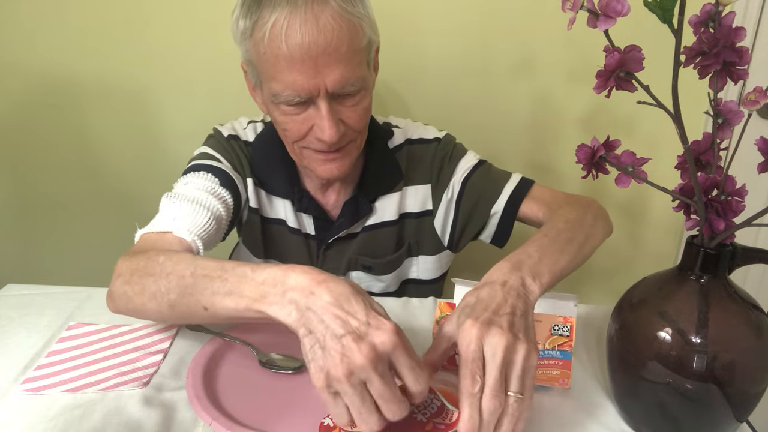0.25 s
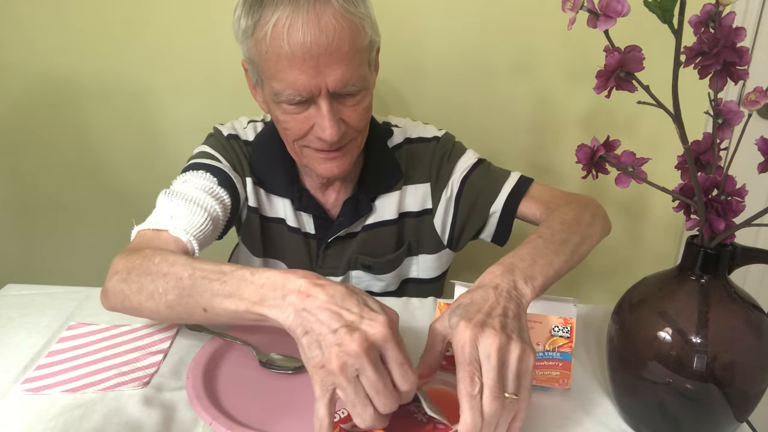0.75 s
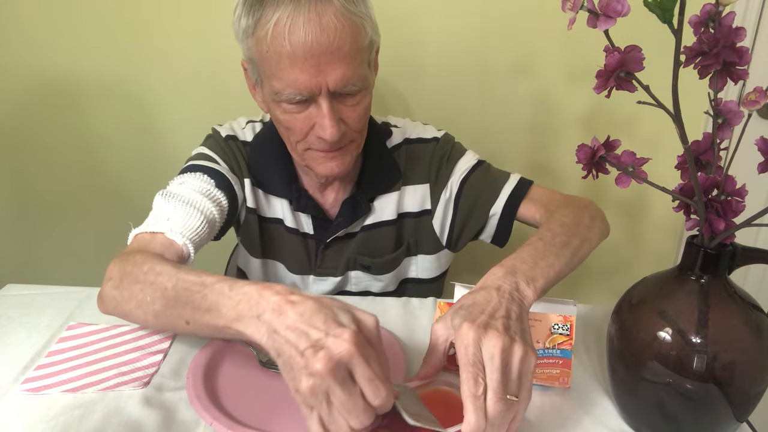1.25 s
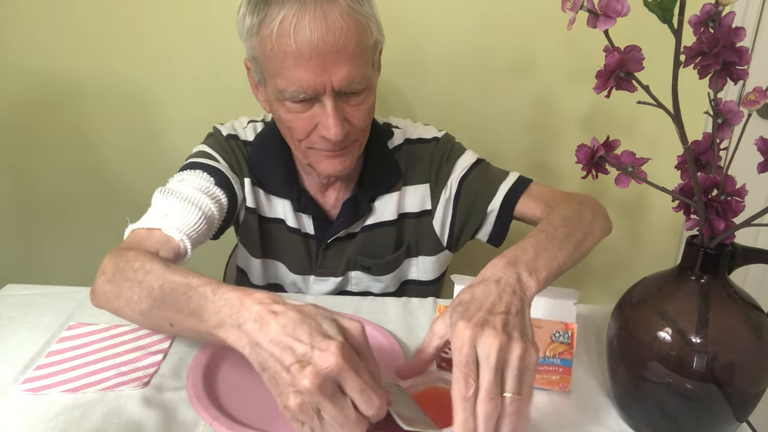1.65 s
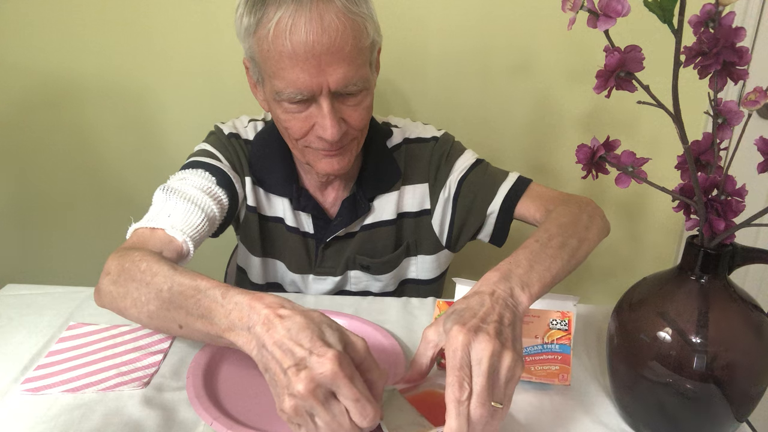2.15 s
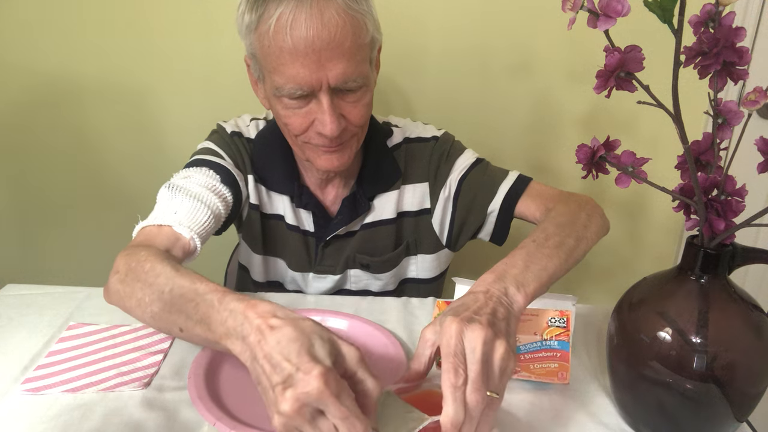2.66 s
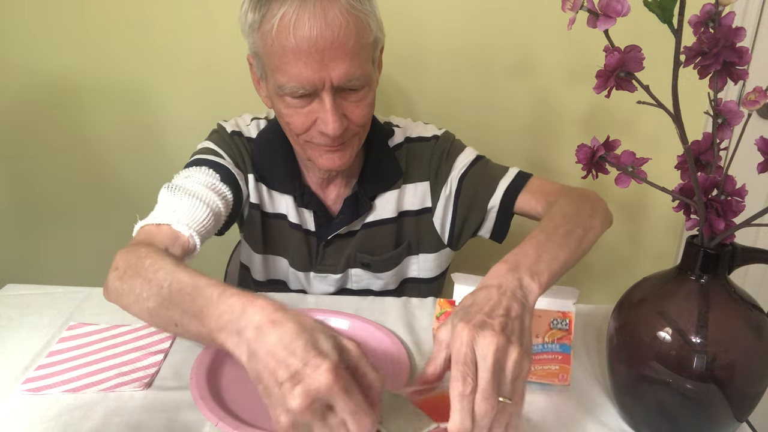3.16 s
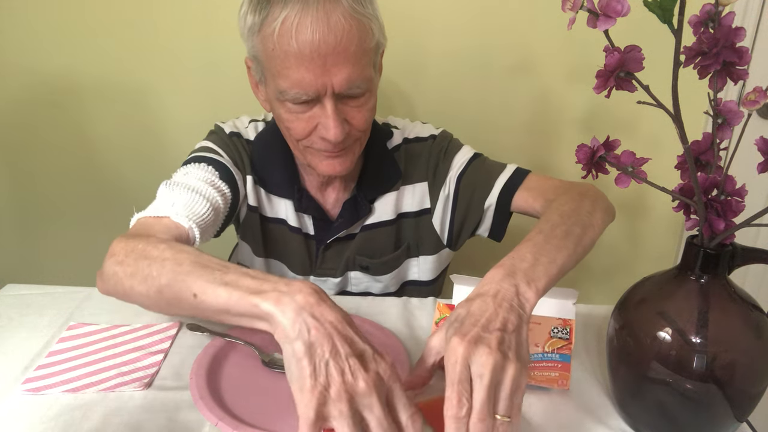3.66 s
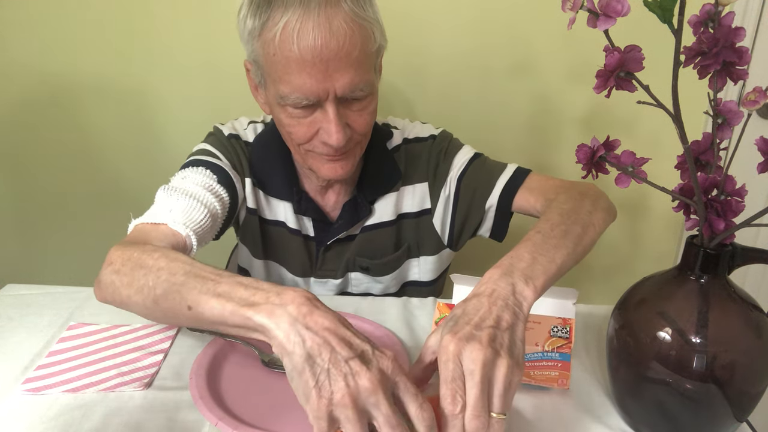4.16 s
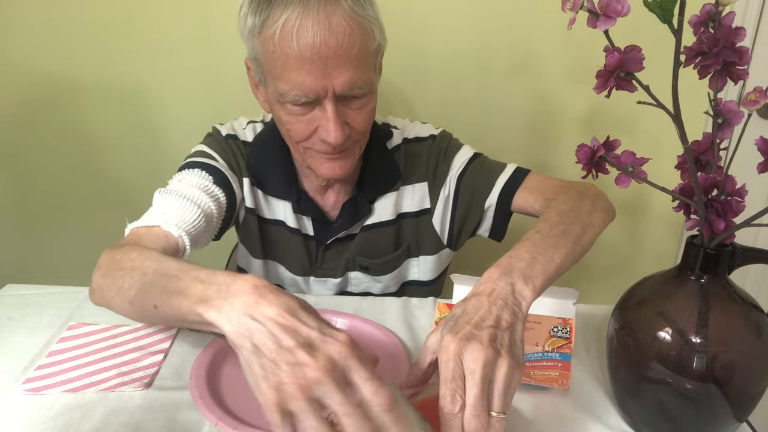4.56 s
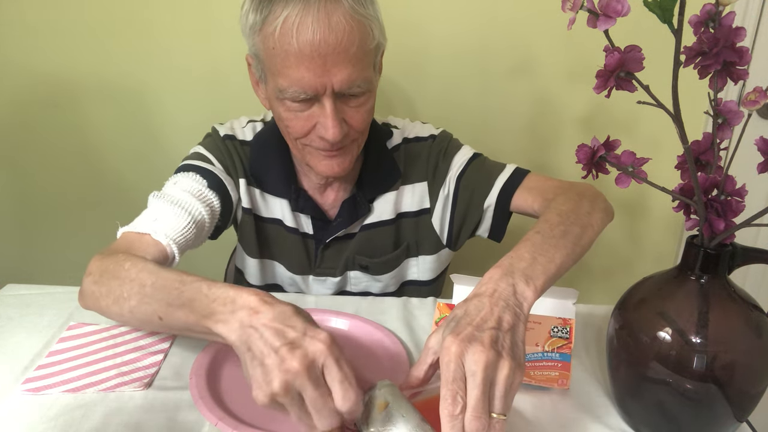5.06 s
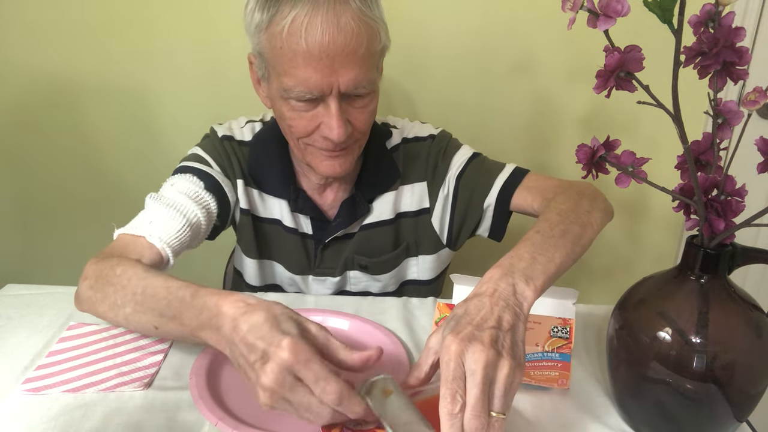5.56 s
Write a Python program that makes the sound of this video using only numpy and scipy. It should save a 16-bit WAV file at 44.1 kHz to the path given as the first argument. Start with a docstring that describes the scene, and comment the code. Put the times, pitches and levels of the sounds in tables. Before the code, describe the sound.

Fingers pick at the stuck foil lid of a small plastic cup, close to the microphone in a small room with a faint low hum. Light clicks and foil rustling start at once, leading to the loudest sound, a hard snap with dull pops, at about 0.8 seconds. Smaller clusters of clicks and pops follow around 1.2, 2.2 and 2.5 seconds, with faint short rasps as the seal tears. Hands bump the table with low booms, most clearly at 1.8, 2.7 and 3.1 seconds. A tiny, faint fingernail squeak comes at 3 seconds, then a few bright snaps near 3.3. From 3.5 seconds the rubbing and tearing get busier, peaking in a crinkly burst around 4.3 and a strong snap at 4.5. After a short lull, more crackling builds to a quick group of sharp cracks at about 5.4 seconds.

```python
"""Picking open a foil-lidded cup

Fingers tug at the stuck foil lid of a small plastic gel cup, close to a camera on a table in a small
room. Lid and cup wall buckle with sharp snaps and dull pops, the seal tears in short rasps, fingertips
rub and crinkle the foil, and a nail squeaks once. The hands bump the table, which booms."""
import sys
import numpy as np
from scipy import signal
from scipy.fft import rfft, irfft, next_fast_len
from scipy.io import wavfile
from scipy.ndimage import uniform_filter1d

SR = 44100
rng = np.random.default_rng(int(sys.argv[2]) if len(sys.argv) > 2 else 0)


def master_out(mix):
    """Clip the mix to full scale and print it as 16-bit PCM to the path in sys.argv[1]."""
    frames = np.transpose(np.atleast_2d(mix))
    ceiling = np.clip(frames, -1, 1)
    pcm = np.round(ceiling * 32767).astype(np.int16)
    wavfile.write(sys.argv[1], SR, pcm)


N = 255537

# lid and cup buckle: t/s, level/dB, ring f/Hz, body/dB, fizz/dB
SNAPS = [(.161, -28, 2050, -5.5, -14.5), (.345, -23.5, 1290, -3, -13.5), (0.3456, -27, 1990, 3.5, -14),
         (0.4214, -21, 2160, -10.5, -19), (0.437, -17.5, 2200, -13, -22), (.472, -18.5, 2040, -17.5, -22),
         (.59, -24, 1580, -11.5, -26), (.624, -23.5, 2200, -16.5, -21.5), (.7748, 4.5, 895, -12, -16.5),
         (0.782, -9, 1010, -18, -23), (.787, -9, 1740, -12, -19), (.977, -27, 910, -14, -11.5),
         (1.07, -41, 910, -10, -3), (1.185, -26.5, 594, -16, -10.5), (1.2542, -19, 3760, -8, -19.5),
         (1.259, -17.5, 725, -12.5, -23), (1.609, -18.5, 3130, -20.5, -27), (2.054, -20.5, 1290, -17, -18),
         (2.18, -40, 1150, -26, -6), (2.24, -20, 1400, -2.5, -29), (2.2452, -13, 1366, -7.5, -21),
         (2.5349, -13.5, 1495, -8, -33), (3.097, -30, 1490, -14.5, -13), (3.195, -26.5, 2720, -7.5, -30),
         (3.2501, -8.5, 2790, -11, -31), (3.2582, -14, 2770, -8, -18), (3.269, -22.5, 645, -10, -17),
         (3.3519, -18, 2720, -15.5, -12.5), (4.006, -39.5, 1680, 6, -22), (4.2734, -16.5, 556, -10, -18.5),
         (4.281, -18.5, 1470, -9.5, -21), (4.311, -24, 1240, -4.5, -6), (4.3965, -20.5, 1710, -22, -12),
         (4.518, -1.5, 1334, -11, -18.5), (4.531, -15, 1440, -3.5, -13), (4.992, -38.5, 1240, -16, -32),
         (5.193, -35, 1220, -14, -11), (5.212, -37.5, 1160, 2, -7), (5.2611, -23, 1100, -11.5, -22),
         (5.331, -25, 1520, -6, -8.5), (5.4145, -2, 1794, -13.5, -30.5), (5.431, -28, 1750, -20.5, 0.5),
         (5.4659, -7, 3170, -17, -7), (5.4692, -10.5, 7200, -8, -16)]
# EQ of one crack of the lid: f/Hz, level/dB
CRACK_EQ = [(100, -2), (350, -9), (700, -5), (1800, 3), (3200, -4), (5000, -4), (7600, -4), (9000, -9),
            (15500, -18.5)]
# cup wall modes: f/Hz, level/dB, t60/s
CUP_MODES = [(690, -9, 0.0066), (872, -7.5, 0.035), (1282, -4, 0.056), (1677, -6.5, 0.038),
             (1864, -10, 0.084), (2200, 6.5, 0.004), (2970, -21, 0.18)]
# dull pops of the full cup: t/s, level/dB, ring f/Hz
POPS = [(.1917, -27.5, 690), (.2415, -32, 560), (.706, -42, 482), (.728, -37.5, 586), (.7675, -18.5, 690),
        (.8435, -13.5, 880), (1.1966, -16.5, 568), (1.26, -27, 367), (1.81, -33.5, 1050),
        (2.0265, -26.5, 740), (2.028, -35.5, 372), (2.0435, -30, 780), (2.24, -17, 820),
        (2.241, -30.5, 300), (2.5349, -21.5, 815), (3.26, -19.5, 747), (4.006, -32.5, 295),
        (4.309, -28, 620)]
# rasps of seal and nail: t/s, length/s, level/dB, tilt/(dB per octave)
RASPS = [(0.049, 0.06, -36.5, .5), (1.109, 0.065, -46, 3), (1.205, 0.063, -40, 1.5),
         (1.6, .052, -45.5, 3.5), (1.994, 0.032, -54, 1), (2.56, 0.07, -35, -1.5), (2.576, 0.044, -41, 6.5),
         (2.695, 0.11, -47, 2.5), (3.035, 0.037, -39, 3.5), (3.232, 0.017, -39, 10),
         (3.55, 0.047, -44, 0.5), (3.633, 0.1, -40.5, 3.5), (3.814, 0.035, -42, -2.5),
         (3.905, 0.021, -36, 0), (4.017, 0.046, -32.5, -0.5), (4.035, 0.01, -28, 8), (4.259, 0.02, -34, 4),
         (4.303, 0.014, -33, 4), (4.332, 0.058, -38, 7.5), (4.345, 0.092, -32.5, -2),
         (4.492, 0.022, -32, 8), (5.044, 0.04, -45, -2), (5.154, 0.056, -43.5, -2),
         (5.316, .032, -38.5, -2)]
# EQ of the tearing seal: f/Hz, level/dB
TEAR_EQ = [(100, -22), (400, 3), (1000, 3), (2000, 4), (4000, 1), (7000, -5), (10000, -12.5),
           (15500, -21.5)]
# fingertips drag over the foil or shift their hold: t/s, length/s, level/dB
STROKES = [(0, 5.5, -51), (.04, 0.16, -42.5), (.36, 0.05, -41), (.85, 0.15, -40), (1.17, 0.076, -46),
           (1.64, 0.21, -44), (2.2, 0.14, -41.5), (2.62, .18, -44.5), (3.06, 0.31, -41), (3.58, .38, -41.5),
           (4.28, 0.14, -29.5), (4.49, 0.036, -28.5), (5.19, 0.25, -40), (5.41, 0.15, -42)]
# EQ of the foil's rustle: f/Hz, level/dB
RUSTLE_EQ = [(100, -23.5), (350, -5.5), (800, -5), (1700, 0), (3800, -1), (6000, -11), (10000, -21),
             (16000, -42)]
# EQ of the fine hiss above it: f/Hz, level/dB
HISS_EQ = [(1500, -58), (4000, -21), (7000, 0), (10000, -6), (16000, -8)]
# hands bump the table: t/s, level/dB, sharpness/(dB per octave)
BUMPS = [(0.35, -28, -9.5), (0.981, -24, -3), (1.199, -22.5, -1), (1.265, -20.5, -6), (1.775, -9.5, 2),
         (2.052, -32.5, -9.5), (2.246, -22, -5.5), (2.575, -23, -1), (2.695, -8, 1.5), (3.118, -14.5, -0.5),
         (3.253, -26, -9), (3.6, -35.5, -19), (3.747, -31.5, -14.5), (3.921, -30, -6.5), (4.278, -29, 4),
         (4.424, -24.5, -1.5), (4.522, -30.5, 9.5), (5.019, -43, -12.5), (5.422, -32, -16),
         (5.475, -29.5, 5)]
# table top modes: f/Hz, level/dB, t60/s
TABLE_MODES = [(60.9, 0.5, 0.44), (95.6, -7.5, 0.46), (132.3, -2, 0.15), (153.8, 3, 0.28),
               (255.8, -21, 0.17), (343, -35, 0.22)]
# EQ of flesh thudding on tablecloth: f/Hz, level/dB
THUD_EQ = [(40, -26), (120, 2), (200, -6), (320, -19.5), (600, -30), (2000, -91)]
# arms lean on the table: t/s, length/s, level/dB
LEANS = [(2.3, 0.24, -28.5), (2.82, 0.44, -24.5)]
# EQ of the rocking table: f/Hz, level/dB
ROCKING_EQ = [(1, -4.5), (5, -6), (14, -20.5), (28, -40.5), (60, -65), (200, -82), (900, -115)]
# early reflections: delay/s, gain
REFLECTIONS = [(.0085, .3), (0.014, 0.28), (.022, .12), (.031, .12)]
# reverb decay: f/Hz, t60/s
ROOM_DECAY = [(150, 0.29), (1000, 0.4), (4000, 0.29), (8000, 0.33), (15000, 0.26)]
# EQ of the room tone: f/Hz, level/dB
ROOM_TONE_EQ = [(10, -4.5), (30, -3), (42, 0.5), (58, 5.5), (78, -11), (100, -2.5), (122, -16), (156, -6),
                (205, -20), (300, -22.5), (600, -28.5), (1600, -35.5), (5000, -42), (15500, -45.5)]

HARD_SNAP_DB = -20  # above this a snap cracks shorter and kicks the table


def snaps(rows):
    """A crease jumps: a crack, then buckling patch and cup wall ring. Returns close sound, reverb send."""
    close, send, t = np.zeros(N), np.zeros(N), np.arange(SR // 8) / SR
    for s, db, hz, body_db, fizz_db in rows:
        bands = [(1300, body_db - 3), (3600, -9), (8500, fizz_db)]
        tone = lambda f: curve(CRACK_EQ, f) + curve(bands, f)
        crack_t60 = .015 * .5 ** (max(db - HARD_SNAP_DB, 0) / 21)
        burst = unit(rng.standard_normal(len(t)) * decay(t, crack_t60) * attack(t, .0016))
        partials = sine(hz, t) + amp(-18.5) * sine(1.578 * hz, t)
        patch = partials * decay(t, .018 * np.sqrt(1000 / hz)) * attack(t, .0012)
        # the changing grip shifts the wall modes a little at every snap
        wall = sum(amp(level + rng.normal(0, 1.5)) * sine(f * rng.normal(1, .025), t) * decay(t, t60)
                   for f, level, t60 in CUP_MODES)
        ring = amp(body_db) * (amp(10.5) * patch + amp(-8) * wall)
        add(close, s, amp(db) * (amp(-7) * eq(burst, tone) + ring))
        # over all directions the burst's peaks and notches even out to one clean click
        click = eq(unit(1. * (t == 0)), lambda f: tone(f) + curve([(2000, -.9), (9000, -2.5)], f))
        add(send, s, amp(db) * (amp(-8) * click + amp(-3) * ring))
    return close, send


def crinkles(rub_db, count):
    """Rows of tiny snaps at random moments, as strong as the fingers are working the foil."""
    when, size, pitch = rng.random((count, 3)).T
    levels = rub_db[(when * N).astype(int)] + 7 - 4.5 * (2 * size - 1)
    ring_hz = 1334 * 2 ** (pitch - .5)
    return [(s, db, hz, -10, -16) for s, db, hz in zip(when * N / SR, levels, ring_hz)]


def pops():
    """The gel damps the cup, so a soft dent rings for only a few cycles."""
    out, t = np.zeros(N), np.arange(SR // 20) / SR
    for s, db, hz in POPS:
        overtones = sine(2 * hz, t) + amp(-6.5) * sine(1800, t)
        ring = sine(hz, t) + amp(-13) * overtones
        add(out, s, amp(db + 9) * ring * decay(t, 8 / hz) * attack(t, .0009))
    return out


def rasps():
    """The seal lets go, or a nail scrapes, in a run of dense slips that ring the stretched foil."""
    out = np.zeros(N)
    for s, length, db, tilt in RASPS:
        ring_hz = 2680 * 2 ** (tilt / 5.5)  # tauter foil rasps brighter and rings higher
        count = int(length * SR)
        run = slips(count, per_second=1100, spread_db=3, smooth=.7) * signal.windows.tukey(count, .6)
        ring_db = lambda f: 5 / (1 + (np.log2((f + 1) / ring_hz) / .3) ** 2)
        tone = lambda f: curve(TEAR_EQ, f) + tilt * np.log2((f + 500) / 3000) + ring_db(f)
        tear = eq(np.pad(run, (0, SR // 100)), tone)
        add(out, s, amp(db - 3.5) * unit(tear))
    return out


def rubbing(rub_db):
    """Fingertips drag over the foil: a grainy rustle, and a finer hiss that swells less steeply."""
    rustle = voiced(slips(N, per_second=160, spread_db=3.5, smooth=2.6), RUSTLE_EQ)
    hiss = voiced(slips(N, per_second=200, spread_db=40, smooth=2.5), HISS_EQ)
    hiss_db = -60 + .76 * (rub_db + 43)
    return amp(rub_db - 8) * rustle + amp(hiss_db) * hiss


def slips(count, per_second, spread_db, smooth):
    """Stick-slip grains of uneven size over smooth friction noise, rms 1."""
    ticks = (rng.random(count) < per_second / SR) * rng.choice([-1, 1], count)
    grains = ticks * amp(spread_db * rng.standard_normal(count).clip(-2, 2))
    return unit(unit(grains) + smooth * rng.standard_normal(count))


def wandering_contact(x, depth_db):
    """The colour shifts at random as the contact points wander over the creases."""
    spectrum = signal.stft(x, nperseg=512)[2]
    drift = uniform_filter1d(rng.standard_normal(spectrum.shape), size=9, axis=0)
    drift = unit(uniform_filter1d(drift, size=5, axis=1))
    shifted = signal.istft(spectrum * amp(depth_db * drift), nperseg=512)[1][:len(x)]
    return shifted / amp(depth_db ** 2 / 9)  # offset the power the drift adds


def squeak(s, length, start_hz, end_hz, db):
    """A nail slides off the foil's edge: a fuzzy resonance falls as the free strip gets longer."""
    out, count = np.zeros(N), int(length * SR)
    glide = np.sin(2 * np.pi * np.cumsum(np.geomspace(start_hz, end_hz, count)) / SR)
    fuzz = unit(uniform_filter1d(rng.standard_normal(count), size=50))
    add(out, s, amp(db) * unit(fuzz * glide * signal.windows.tukey(count, .6)))
    return out


def table_booms():
    """Hand bumps and hard snaps swell into the table's low modes; sharper blows favour the upper ones."""
    out, t = np.zeros(N), np.arange(SR // 2) / SR
    kicks = [(s, -33 + .34 * db, 2.5) for s, db, *_ in SNAPS if db > HARD_SNAP_DB]
    for s, db, sharpness in BUMPS + kicks:
        ring = sum(amp(level + sharpness * np.log2(f / 100))
                   * sine(f * rng.normal(1, .0099), t) * decay(t, t60) for f, level, t60 in TABLE_MODES)
        push = amp(-7 + sharpness) * sine(125, t) * decay(t, .014)
        thud = amp(-13.5 + sharpness) * voiced(rng.standard_normal(len(t)), THUD_EQ) * decay(t, .13)
        add(out, s, amp(db) * (ring + push + thud) * attack(t, .0079, power=2))
    # the table top radiates little below its first mode
    return signal.sosfilt(signal.butter(3, 42, "high", fs=SR, output="sos"), out)


def with_echoes(x, db):
    """The sound plus its slightly dulled early echoes from table and wall."""
    out, dulled = x.copy(), np.convolve(x, [.25, .5, .25])
    for delay, gain in REFLECTIONS:
        add(out, delay, amp(db) * gain * dulled)
    return out


def reverb(x, wet_db):
    """The room's diffuse tail, new every quarter second as the hands move."""
    out, hop = np.zeros(N), SR // 4
    for start in range(0, N, hop):
        hz, t, noise = signal.stft(rng.standard_normal(SR // 2), SR, nperseg=256)
        tail = signal.istft(noise * decay(t, curve(ROOM_DECAY, hz)[:, None]), SR, nperseg=256)[1]
        tail *= attack(np.arange(len(tail)) / SR, .0021, power=2)
        add(out, start / SR, signal.fftconvolve(x[start:start + hop], tail / np.linalg.norm(tail)))
    return amp(wet_db) * out


def background():
    """Steady room tone, and sub rumble as leaning arms rock the table under the camera."""
    room_tone = voiced(rng.standard_normal(N), ROOM_TONE_EQ)
    rocking = voiced(rng.standard_normal(N), ROCKING_EQ)
    lean_db = envelope_db(LEANS, rise_db_per_s=108, fall_db_per_s=45, rest_db=-38)
    return amp(-42) * room_tone + amp(lean_db) * rocking


def envelope_db(moves, rise_db_per_s, fall_db_per_s, rest_db):
    """Fader ride: each move rises, holds and falls back to rest."""
    t, level = np.arange(N) / SR, np.full(N, float(rest_db))
    for s, length, db in moves:
        before, after = np.maximum(s - t, 0), np.maximum(t - s - length, 0)
        level = np.maximum(level, db - rise_db_per_s * before - fall_db_per_s * after)
    return level


def eq(x, db_at):
    """Minimum-phase filter with a gain of db_at(f)."""
    size = 2 * next_fast_len(len(x))
    cepstrum = irfft(np.log(amp(db_at(np.fft.rfftfreq(size, 1 / SR)))), size)
    cepstrum[1:size // 2] *= 2
    cepstrum[size // 2 + 1:] = 0
    return irfft(rfft(x, size) * np.exp(rfft(cepstrum)), size)[:len(x)]


def voiced(x, points):
    """Shape with an EQ table, rms 1."""
    return unit(eq(x, lambda f: curve(points, f)))


def curve(points, hz):
    """Read (f/Hz, value) points on a log frequency axis."""
    f, values = np.transpose(points)
    return np.interp(np.log(hz + 1), np.log(f + 1), values)


def sine(hz, t):
    """A pure tone."""
    return np.sin(2 * np.pi * hz * t)


def attack(t, rise_s, power=1):
    """Rise from 0 to 1; power 2 starts softer."""
    return 1 - np.exp(-(t / rise_s) ** power)


def decay(t, t60):
    """Exponential decay, 60 dB down after t60."""
    return np.exp(-np.log(1000) * t / t60)


def amp(db):
    """Decibels to gain."""
    return 10 ** (np.asarray(db) / 20)


def unit(x):
    """Scale to rms 1."""
    return x / np.sqrt(np.mean(x ** 2) + 1e-20)


def add(track, s, sound):
    """Mix a sound into a track at time s."""
    start = round(s * SR)
    part = track[start:start + len(sound)]
    part += sound[:len(part)]


def scene():
    """Cup and fingers up close with the room behind them; the table's boom stays dry."""
    rub_db = envelope_db(STROKES, rise_db_per_s=378, fall_db_per_s=150, rest_db=-85)
    close_snaps, snap_send = snaps(SNAPS + crinkles(rub_db, count=50))
    dents = pops()
    fingers = wandering_contact(rasps() + rubbing(rub_db), depth_db=2.5)
    fingers += squeak(s=3.043, length=.036, start_hz=5300, end_hz=1805, db=-40.5)
    direct = with_echoes(close_snaps, db=-5) + with_echoes(dents, db=-14) + fingers + table_booms()
    tails = reverb(snap_send, wet_db=-4) + reverb(dents, wet_db=-7) + reverb(fingers, wet_db=-6)
    return (direct + tails + background())[None]


def record(dry):
    """The microphone overloads softly on the hardest snap; the top end is cut at 16 kHz."""
    saturated = dry / (1 + np.abs(dry / .78) ** 8) ** (1 / 8)
    size = next_fast_len(N + SR // 2)
    passband = np.fft.rfftfreq(size, 1 / SR) < 16000
    return irfft(rfft(saturated, size) * passband, size)[..., :N]


dry = scene()
out = record(dry)
master_out(out)
```